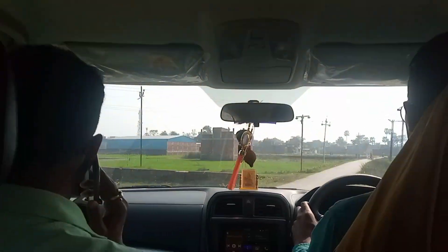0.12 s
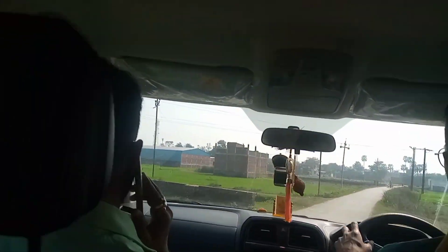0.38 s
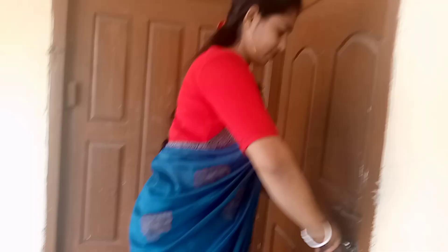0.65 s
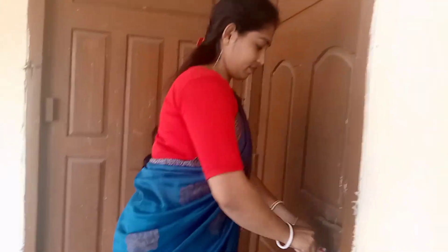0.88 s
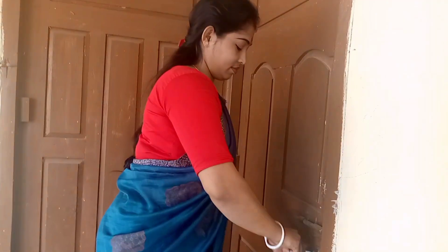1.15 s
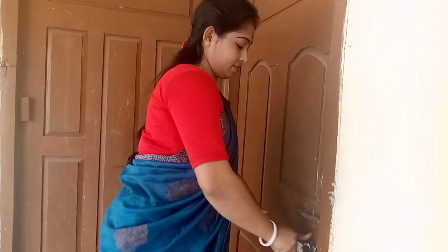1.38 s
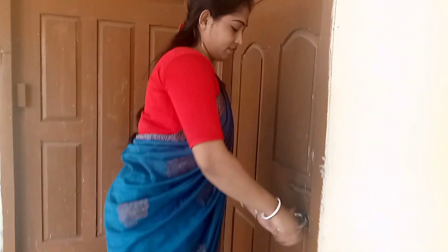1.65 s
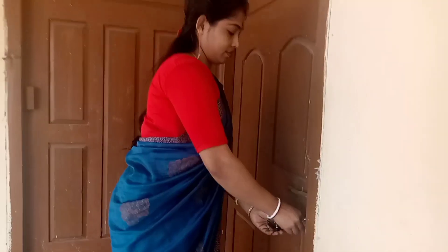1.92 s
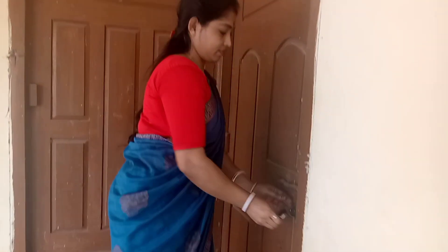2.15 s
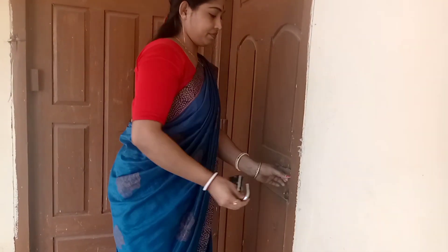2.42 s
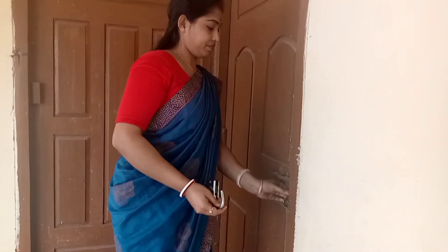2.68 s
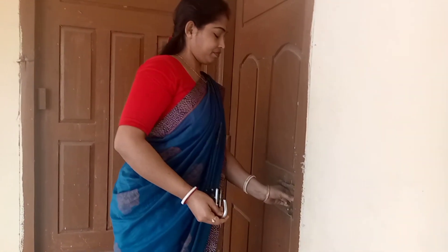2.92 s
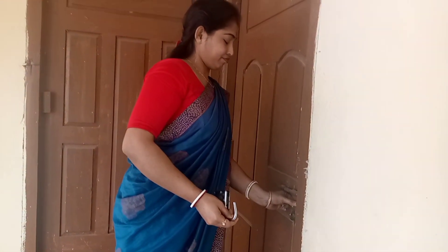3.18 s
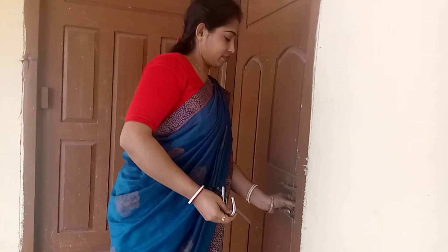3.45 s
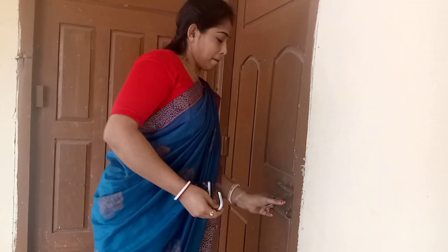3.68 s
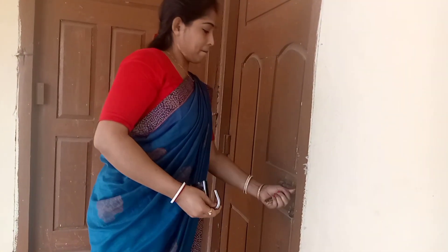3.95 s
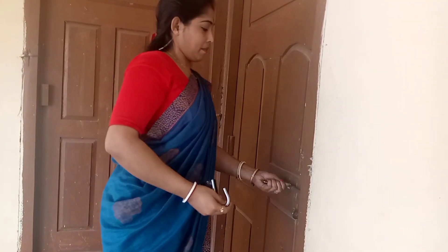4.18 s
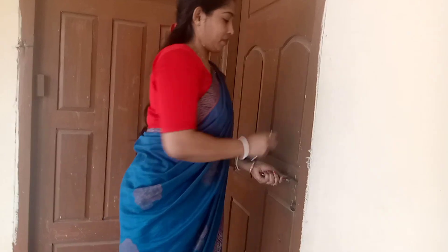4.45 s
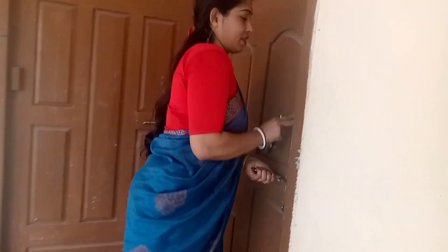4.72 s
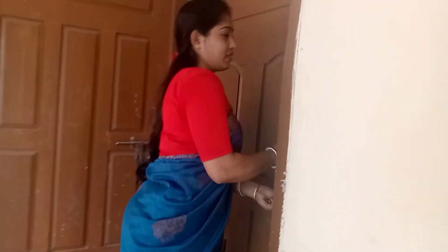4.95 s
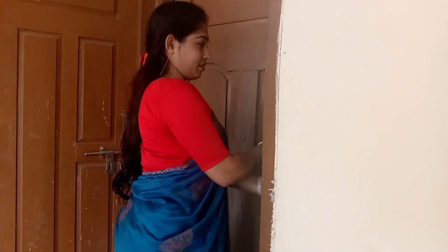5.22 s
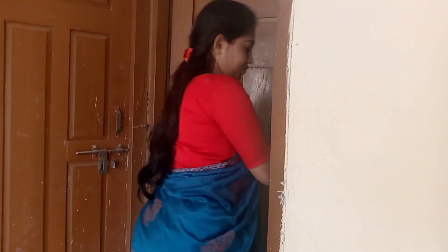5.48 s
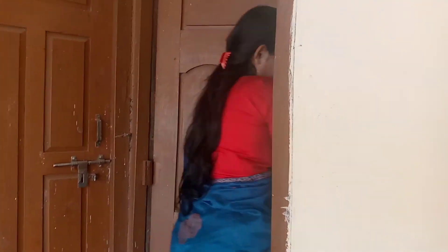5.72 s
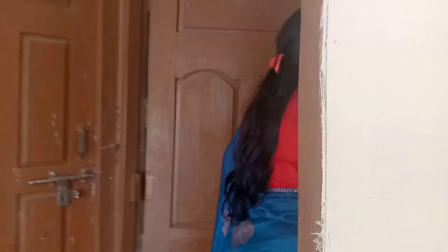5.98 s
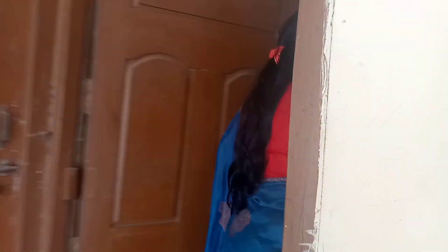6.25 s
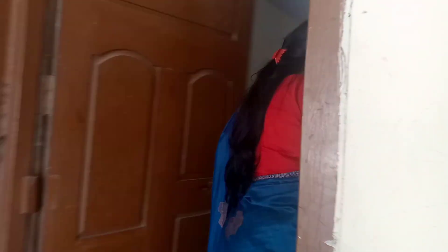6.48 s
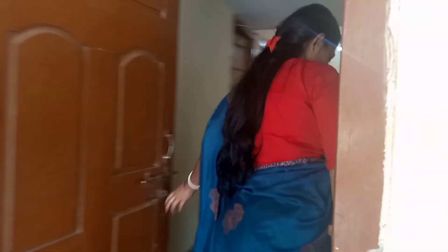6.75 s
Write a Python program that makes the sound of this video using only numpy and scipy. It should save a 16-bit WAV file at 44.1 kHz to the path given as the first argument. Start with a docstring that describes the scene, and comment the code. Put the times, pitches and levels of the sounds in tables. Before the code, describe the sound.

After brief silence, water hiss and motor hum fade in; keys and padlock clink, a bolt bangs, and a wooden door judders open, echoing.

```python
"""After a silence, water hiss and spatter, a motor hum and outdoor rumble fade in around a hard, echoing porch.
Keys and a padlock clink (short noise bursts) and knock on a wooden door (noise rattles through ringing modes).
The level dips briefly, then a bolt slides (uneven noise grains) and bangs; the door sticks and judders free
(stick-slip jerks and grit). A soft noise rustle follows as it swings open, and its hinges squeak faintly
(wavering tones) among the last clicks."""
import sys
import numpy as np
from scipy import signal
from scipy.fft import rfft, irfft, next_fast_len
from scipy.io import wavfile
from scipy.ndimage import uniform_filter1d

SR = 44100
rng = np.random.default_rng(int(sys.argv[2]) if len(sys.argv) > 2 else 0)


def convert_level_to_amplitude(level_db):
    """Map a level in decibels to its linear amplitude factor."""
    exponent = np.asarray(level_db, float) / 20
    return 10 ** exponent


def to_wav(s):
    """Save 16-bit WAV."""
    ch = np.atleast_2d(s).T  # columns
    pcm = np.round(np.clip(ch, -1, 1) * 32767)  # PCM
    wavfile.write(sys.argv[1], SR, pcm.astype(np.int16))


N = 303011
T = np.arange(N) / SR


def evened(x):
    """Scales to rms 1."""
    return x / np.sqrt(np.mean(x ** 2) + 1e-20)


def read(points, hz):
    """Reads a spectrum on a log-frequency axis."""
    f, value = np.transpose(points)
    return np.interp(np.log(hz + 1), np.log(f + 1), value)


def coloured(x, spectrum):
    """Filters x, without phase shift, by a (frequency [Hz], level [dB]) spectrum."""
    size = next_fast_len(len(x))
    gain = convert_level_to_amplitude(read(spectrum, np.fft.rfftfreq(size, 1 / SR)))
    return irfft(rfft(x, size) * gain, size)[:len(x)]


def ring(modes, spread=0.):
    """Impulse response of dying modes, energy 1; spread detunes them for each place that is struck."""
    t = T[:SR // 3]
    h = np.zeros(len(t))
    for hz, db, t60 in modes:
        detuned_hz = hz * (1 + spread * rng.standard_normal())
        h += convert_level_to_amplitude(db - 60 * t / max(t60, .003)) * np.sin(2 * np.pi * detuned_hz * t)
    return h / np.linalg.norm(h)


def wander(hz):
    """Slow random drift of rms 1: noise through a one-pole lowpass."""
    return evened(signal.lfilter([1], [1, -np.exp(-2 * np.pi * hz / SR)], rng.standard_normal(N)))


def swell(start, rise, hold, db, fall_db):
    """Gain that ramps up, holds, then falls by so many dB a second."""
    t = T - start
    return np.clip(t / max(rise, .001), 0, 1) * convert_level_to_amplitude(db - fall_db * np.maximum(t - rise - hold, 0))


def add(mix, s, sound):
    """Mixes a sound in at time s."""
    part = mix[round(s * SR):][:len(sound)]
    part += sound[:len(part)]


# blows of metal on the door, before echo and microphone:
# (time [s], clack level [dB], clack centre [Hz], crack level [dB], rattle length [s])
DOOR_BLOWS = [(1.558, -48.5, 3040, -16, .011), (2.1075, -29, 2450, -18, .0054),
              (2.111, -19, 1050, -21, .0105), (3.664, -32, 1800, -42, .009), (3.671, -28, 1300, -46, .015),
              (4.124, -35, 250, -60, .018), (4.147, -29, 1400, -40, .014), (4.164, -23.5, 1650, -27, .005),
              (4.188, -25, 4900, -11.5, .011), (4.198, -22.5, 1500, -30, .013),
              (4.216, -22.5, 1100, -34, .013), (4.368, -45, 1510, -32, .017),
              (4.848, -20.5, 2600, -42, .003), (5.753, -33, 2250, -48, .0034),
              (6.383, -32.5, 3100, -50, .0056), (6.645, -31.5, 2800, -46, .0061)]
# ringing modes of lock and bolt: (frequency [Hz], relative level [dB], t60 [s])
LOCK_MODES = [(1125, -5.5, 0.11), (1180, 4, 0.061), (1685, 3.5, 0.013), (2460, -1.5, 0.012),
              (3375, 4, 0.014), (6400, 9, .03), (6760, 8, .08), (8700, 1, .05)]
# ringing modes of the door panel: (frequency [Hz], relative level [dB], t60 [s])
PANEL_MODES = [(199, -10.5, 0.081), (264, 2, 0.05), (330, -1.5, 0.15), (390, 2.5, 0.041), (504, 2, 0.1),
               (586, -6, 0.11), (703, -7, 0.029), (805, 5, 0.013), (940, -5.5, 0.028)]
# spectrum of the crack of metal contact: (frequency [Hz], relative level [dB])
CRACK_SPECTRUM = [(2500, -20), (4500, 4), (7000, 5), (9500, 13.5), (12500, 11), (14500, 22), (16000, 23)]
# longer, heavier contacts drive the panel harder than the clack: thud against clack for a HEAVY_S contact
THUD_DB, THUD_DB_PER_DOUBLING, HEAVY_S = -3.5, 14, .012


def blows():
    """Each blow is a short rattle of contacts: a wide clack, a bright crack and a thud of the panel."""
    out = np.zeros(N)
    t = T[:SR // 6] - .005  # silent lead, room for the filters to spread ahead of the blow
    for s, clack_db, hz, crack_db, length in DOOR_BLOWS:
        length = max(length, .0005)
        thud_db = clack_db + THUD_DB + THUD_DB_PER_DOUBLING * np.log2(length / HEAVY_S)
        envelope = np.exp(-abs(t / length) ** 1.6) * np.clip(t / .0006, 0, 1)
        rattle = rng.standard_normal(len(t)) * envelope
        wide = coloured(rattle, [(0.092 * hz, -22), (.5 * hz, -6), (hz, 0), (2 * hz, -10), (4 * hz, -22)])
        clack = wide + .25 * signal.fftconvolve(wide, ring(LOCK_MODES, .005))[:len(t)]
        ping = signal.fftconvolve(wide, ring([(hz, 0, .01)]))[:len(t)]
        clack += 0.001 / length * ping  # a short sharp contact lets the struck part ping
        crack = coloured(rattle, CRACK_SPECTRUM)
        crack += .25 * signal.fftconvolve(crack, ring(LOCK_MODES, .005))[:len(t)]
        thud = signal.fftconvolve(rattle, ring(PANEL_MODES, .03))
        for db, part in (clack_db, clack), (crack_db, crack), (thud_db, thud):
            energy_scale = np.sqrt(length * SR / 2)  # longer rattles carry more energy
            add(out, s + t[0], convert_level_to_amplitude(db) * part / np.linalg.norm(part) * energy_scale)
    return out


# friction spectrum: (frequency [Hz], relative level [dB])
GRIT_SPECTRUM = [(70, -30), (170, 0), (400, 3.5), (1200, 0), (2500, -2.5), (4000, -10), (7000, -13),
                 (16000, -16)]
# what the whole leaf radiates when jerked: (frequency [Hz], relative level [dB])
LEAF_SPECTRUM = [(55, -30), (72, -3), (82, 4), (115, 6.5), (165, -3), (245, -10), (330, -9.5), (420, -19),
                 (600, -12), (900, -16), (2000, -43)]
# swell of the shaking leaf: (start [s], rise [s], hold [s], level [dB], fall [dB/s])
SHAKE_SWELL = (4.905, .09, .275, -23.3, 85)
# swell of the scraping grit: (start [s], rise [s], hold [s], level [dB], fall [dB/s])
SCRAPE_SWELL = (4.885, .135, .09, -21.2, 72)
THROB_HZ, THROB_TOP_S, THROB_DB = 8.1, 5.135, 3.2  # the shaking leaf swells and sags
# slips quicken with each throb, and once the grip lets go
SLIPS_PER_S, SLIP_SWING, FREED_GAIN_PER_S2 = 80, .05, 90


def judder():
    """Stick and slip: near-regular jerks shake the leaf, and each throws off a puff of grit."""
    throb = np.cos(2 * np.pi * THROB_HZ * (T - THROB_TOP_S))
    since_freed = np.clip(T - sum(SHAKE_SWELL[:3]), 0, .5)
    rate = SLIPS_PER_S * (1 + SLIP_SWING * throb) + FREED_GAIN_PER_S2 * since_freed
    slips = np.cumsum(rate * (1 + .03 * wander(30))) / SR  # running count
    jerks = (np.diff(np.floor(slips), prepend=0) > 0) * convert_level_to_amplitude(2 * wander(200))
    knocks = signal.fftconvolve(jerks, ring(PANEL_MODES))[:N]  # each jerk also knocks the panel
    shake = evened(coloured(jerks, LEAF_SPECTRUM)) * convert_level_to_amplitude(THROB_DB * throb)
    puff_shape = 0.8 + np.exp(-(slips % 1) / 0.35)  # strongest just after each slip
    puffs = evened(coloured(rng.standard_normal(N), GRIT_SPECTRUM) * puff_shape)
    puffs *= convert_level_to_amplitude(2.2 * wander(29))  # the grip comes and goes
    return swell(*SHAKE_SWELL) * shake + swell(*SCRAPE_SWELL) * (puffs + 0.3 * evened(knocks))


# the bolt sliding in its staples: (start [s], rise [s], hold [s], level [dB], fall [dB/s])
BOLT_SLIDES = [(3.69, .03, .08, -39, 150), (4.115, .045, .07, -28, 100)]


def slides():
    """Dense uneven grains of metal on metal pass into the panel and the bolt."""
    grains = rng.standard_normal(N) * convert_level_to_amplitude(2.5 * wander(60))
    sound = evened(coloured(grains, GRIT_SPECTRUM))
    sound += 0.57 * evened(signal.fftconvolve(grains, ring(PANEL_MODES))[:N])
    sound += 0.11 * evened(signal.fftconvolve(grains, ring(LOCK_MODES))[:N])
    return evened(sound) * sum(swell(*row) for row in BOLT_SLIDES)


# hinge and bolt squeaks, around which pitch and level waver:
# (start [s], length [s], start pitch [Hz], end pitch [Hz], level [dB], second harmonic level [dB])
DRY_SQUEAKS = [(4.875, .085, 1020, 945, -37, -65), (5.887, .058, 1975, 1975, -46, -46),
               (5.978, .033, 2006, 2006, -46, -53), (6.062, .39, 8780, 8760, -52, -88)]


def squeaks():
    """Thin wavering tones of dry metal turning."""
    out = np.zeros(N)
    waver, flutter = wander(40), wander(50)
    for s, length, hz, end_hz, db, second_db in DRY_SQUEAKS:
        n = round(length * SR)
        at = slice(round(s * SR), round(s * SR) + n)
        glide = np.linspace(hz, end_hz, n) * (1 + 0.004 * waver[at])
        phase = 2 * np.pi * np.cumsum(glide) / SR
        tone = convert_level_to_amplitude(db) * np.sin(phase)
        if 4 * hz < SR:  # the harmonic must fit below half the sample rate
            tone += convert_level_to_amplitude(second_db) * np.sin(2 * phase)
        out[at] += np.sqrt(2) * tone * convert_level_to_amplitude(2.5 * flutter[at]) * signal.windows.tukey(n, .5)
    return out


# fainter clinks fall at random: time range [s], top peak level [dB], spread below it [dB], pitch range [Hz]
JINGLE_S, JINGLE_DB, JINGLE_SPREAD_DB, JINGLE_HZ = (1.0, 2.85), -24, 9, (4900, 6700)


def jingle(count=14):
    """Rows of fainter clinks at random times, levels and pitches."""
    when, size, pitch = rng.random((count, 3)).T
    times = np.interp(when, (0, 1), JINGLE_S)
    levels = JINGLE_DB - JINGLE_SPREAD_DB * size
    return list(zip(times, levels, np.interp(pitch, (0, 1), JINGLE_HZ)))


# keys and lock clinking lightly, the clearest: (time [s], peak level [dB], pitch [Hz])
CLEAR_CLINKS = [(.85, -18, 5850), (.9023, -16, 6760), (.925, -18, 4860), (.9987, -19, 6460),
                (1.0505, -22, 6500), (1.1438, -20, 6130), (1.4409, -22, 6600), (1.514, -19, 5500),
                (2.189, -22, 6000), (4.951, -18, 4170), (5.3497, -19, 4500), (5.457, -19, 4660),
                (6.0197, -24, 6140), (6.2392, -23, 6210)]


def clinks():
    """Brief bright bursts with a short ring at their own pitch."""
    out, t = np.zeros(N), T[:SR // 20]
    for s, db, hz in list(CLEAR_CLINKS) + jingle():
        burst = rng.standard_normal(len(t)) * np.exp(-t / 0.0066) * np.minimum(t / 0.0016, 1)
        bright = evened(coloured(burst, [(.5 * hz, -20), (hz, 0), (16000, -3)]))
        ringing = evened(signal.fftconvolve(burst, ring([(hz, 0, .008)]))[:len(t)])
        part = bright + .3 * ringing
        add(out, s, convert_level_to_amplitude(db) * part / abs(part).max())
    return out


# rustle spectrum: (frequency [Hz], relative level [dB])
RUSTLE_SPECTRUM = [(100, -6), (140, 7), (220, -8), (700, -1), (1500, -4), (3000, -2), (5500, -14)]
# (start [s], rise [s], hold [s], level [dB], fall [dB/s])
RUSTLE_RISE = (5.3, .7, .5, -44, 4)


def rustle():
    """Soft uneven noise that comes up as the door swings open, perhaps cloth and the room beyond."""
    noise = evened(coloured(rng.standard_normal(N), RUSTLE_SPECTRUM))
    return swell(*RUSTLE_RISE) * noise * convert_level_to_amplitude(2.5 * wander(12))


# reverberation of the porch: (frequency [Hz], t60 [s])
PORCH_T60 = [(80, 0.43), (300, 2.18), (1000, 1.46), (3000, 0.72), (8000, 0.48), (16000, 0.51)]


def porch(x):
    """Sparse reflections of random sign, each band dying at its own speed."""
    x = coloured(x, [(90, -7), (250, -0.5)])  # the open side of the porch lets the bass escape
    taps = np.zeros(SR + SR // 2)
    at = np.arange(300, len(taps) - 20, 20)
    taps[at + rng.integers(0, 20, len(at))] = rng.choice([-1., 1.], len(at))
    hz, t, z = signal.stft(taps, SR, nperseg=256)
    decay = convert_level_to_amplitude(-60 * t / np.maximum(read(PORCH_T60, hz), .05)[:, None])
    tail = signal.istft(z * decay, SR, nperseg=256)[1]
    tail *= 1 + 0.71 * np.exp(-T[:len(tail)] / 0.071)  # near walls answer first and loudest
    return signal.fftconvolve(x, tail / np.linalg.norm(tail))[:N]


# water spectrum: (frequency [Hz], relative level [dB])
WATER_SPECTRUM = [(600, -9.5), (2000, -1.7), (3000, 2), (4100, -1.5), (6000, 6.5), (16000, -0.5)]
# (time [s], level [dB])
WATER_FADER = [(.68, -32), (1.5, -34), (3.5, -37), (4.8, -37), (5.8, -35.5), (6.9, -41.5)]


def water():
    """Hiss that flickers in patches of time and pitch and as random spatters land, each dying away."""
    spatter = (rng.random(N) < 60 / SR) * np.minimum(rng.exponential(1, N), 3)  # about 60 a second
    splashes = signal.lfilter([1], [1, -np.exp(-1 / (0.0045 * SR))], spatter)
    flicker = np.sqrt(1 + 1.32 * splashes)
    z = signal.stft(rng.standard_normal(N) * flicker, SR, nperseg=256)[2]
    patches = uniform_filter1d(uniform_filter1d(rng.standard_normal(z.shape), 3, 0), 8, 1)
    hiss = signal.istft(z * convert_level_to_amplitude(1.67 * evened(patches)), SR, nperseg=256)[1][:N]
    return evened(coloured(hiss, WATER_SPECTRUM)) * convert_level_to_amplitude(np.interp(T, *np.transpose(WATER_FADER)))


# the strong line of the motor, around which it wavers: (time [s], level [dB])
HUM_FADER = [(.68, -43.5), (2.2, -46), (2.7, -39), (3.3, -43.5), (4.0, -36.5), (4.8, -39.5), (5.6, -36.5),
             (6.1, -45), (6.5, -54), (6.9, -48)]
HUM_HZ, HUM_DRIFT_HZ_PER_S = 297.3, .33  # pitch at time zero, and its climb
WEAK_DB, WEAK_FADE_DB_PER_S = -42, 4.5  # the line at 5/3 of it, at time zero, dies away


def hum():
    """Two lines of a distant motor, wavering in pitch and level."""
    pitch = (HUM_HZ + HUM_DRIFT_HZ_PER_S * T) * (1 + 0.00395 * wander(6.1))
    phase = 2 * np.pi * np.cumsum(pitch) / SR
    strong_db = np.interp(T, *np.transpose(HUM_FADER)) + 1.1 * wander(6.2)
    weak_db = WEAK_DB - WEAK_FADE_DB_PER_S * T + 2.5 * wander(3)
    return np.sqrt(2) * (convert_level_to_amplitude(strong_db) * np.sin(phase) + convert_level_to_amplitude(weak_db) * np.sin(phase * 5 / 3))


# rumble spectrum: (frequency [Hz], relative level [dB])
RUMBLE_SPECTRUM = [(60, -23), (110, 0), (160, -0.5), (220, -3), (450, -3), (560, -8), (680, -12),
                   (1200, -14), (2200, -15), (3200, -16), (6000, -26)]
RUMBLE_DB = -37


def rumble():
    """Low outdoor noise, wavering slightly in level."""
    low = evened(coloured(rng.standard_normal(N), RUMBLE_SPECTRUM))
    return low * convert_level_to_amplitude(0.9 * wander(6.2)) * convert_level_to_amplitude(RUMBLE_DB)


TRAFFIC_DB, DOORWAY_S, TRAFFIC_FADE_DB_PER_S = -46.5, 5.5, 3  # the fade starts at DOORWAY_S


def traffic():
    """Deep noise of distant traffic under the rumble, fading as the microphone nears the doorway."""
    spectrum = [(25, -9), (60, -2), (95, 5), (140, -10), (250, -38.5)]
    deep = evened(coloured(rng.standard_normal(N), spectrum))
    return deep * convert_level_to_amplitude(TRAFFIC_DB - TRAFFIC_FADE_DB_PER_S * np.maximum(T - DOORWAY_S, 0))


def scene():
    """The door near by, its echo, and the steady surroundings."""
    hits = blows()
    rubs = judder() + slides()
    thin = squeaks() + clinks()
    echo = porch(convert_level_to_amplitude(-0.5) * hits + convert_level_to_amplitude(-2) * rubs + convert_level_to_amplitude(-21) * thin)
    surroundings = water() + hum() + rumble() + traffic()
    return (hits + rubs + thin + echo + rustle() + surroundings)[None]


def band_limit(x):
    """A steep low-pass at the top of the band."""
    return signal.sosfilt(signal.butter(12, 16840, fs=SR, output="sos"), x)


# microphone colour: (frequency [Hz], level [dB])
MIC_RESPONSE = [(25, -21), (60, -1.5), (100, -3), (5000, 2), (6600, 1), (7900, -9), (9300, -6),
                (11500, -17), (13600, -24.5), (14600, -13), (15650, -10.5), (15800, -40), (17000, -70)]
# the level dips briefly: (time [s], half width [s], level [dB])
LEVEL_DIP = (2.876, .004, -12)
LIMIT = 0.59  # amplitude where the amplifier flattens
# straight ramp of gain from the share FADE_FROM up to full, climbing by 1 per FADE_S
FADE_START_S, FADE_S, FADE_FROM = .68, .36, .05


def record(dry):
    """Microphone colour, soft overload, a fade-in from silence and a brief dip."""
    picked_up = coloured(dry[0], MIC_RESPONSE)
    overloaded = LIMIT * np.tanh(picked_up / LIMIT)
    fade = np.minimum(FADE_FROM + (T - FADE_START_S) / FADE_S, 1) * (T > FADE_START_S)
    s, half_width, db = LEVEL_DIP
    dip = convert_level_to_amplitude(db * np.exp(-((T - s) / half_width) ** 2))
    mix = (fade * dip * overloaded)[None]
    return band_limit(mix)


dry = scene()
out = record(dry)
to_wav(out)
```